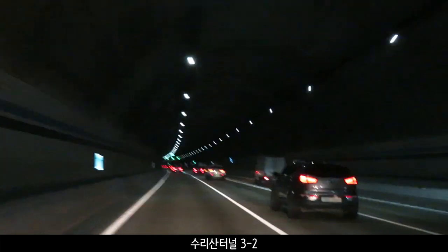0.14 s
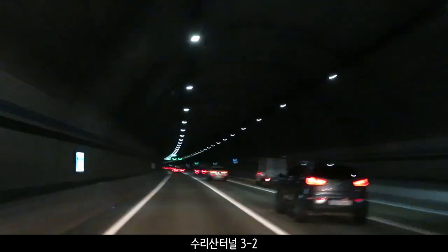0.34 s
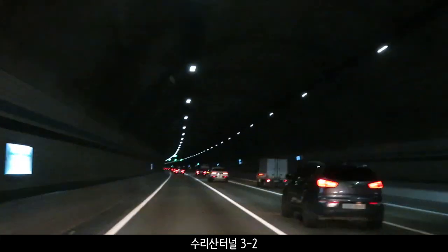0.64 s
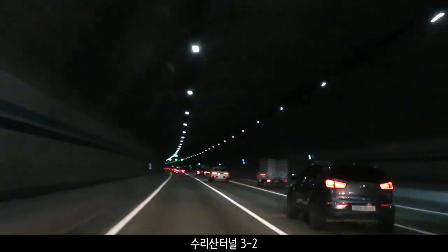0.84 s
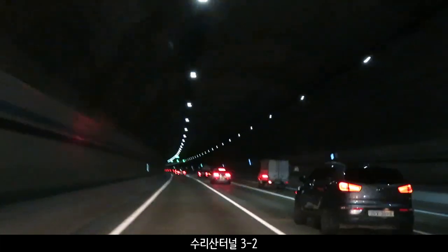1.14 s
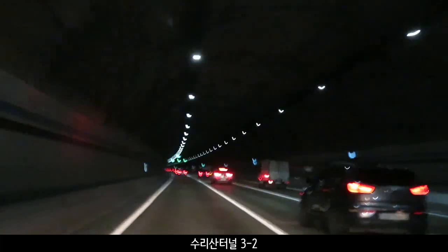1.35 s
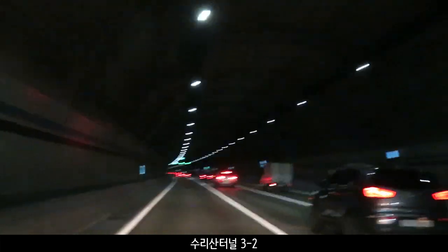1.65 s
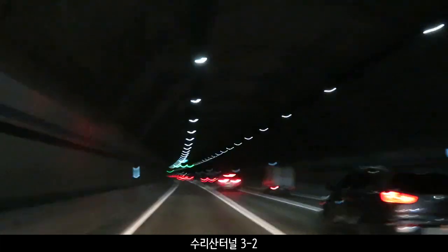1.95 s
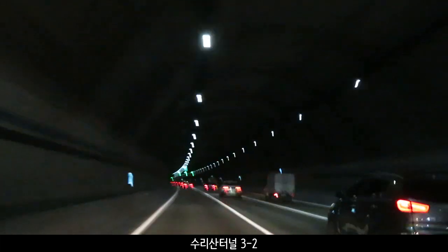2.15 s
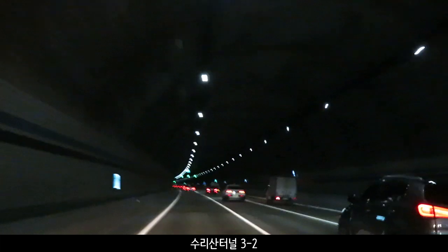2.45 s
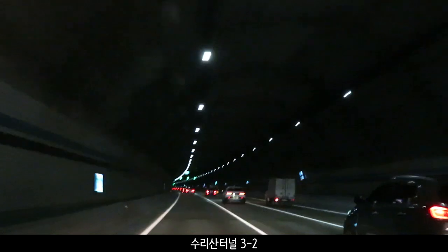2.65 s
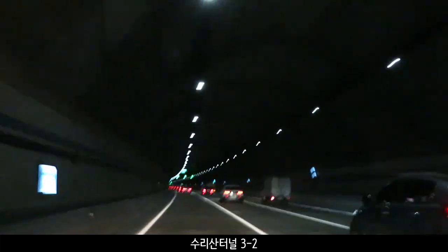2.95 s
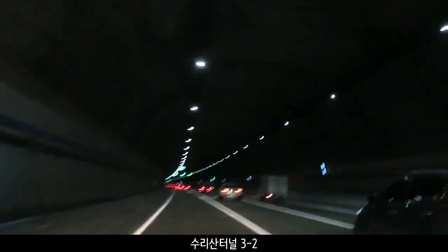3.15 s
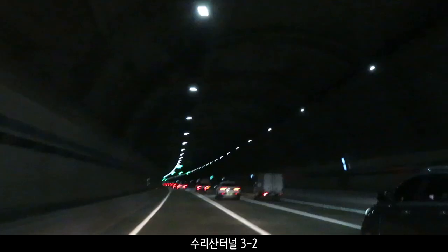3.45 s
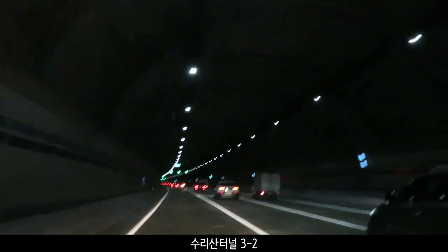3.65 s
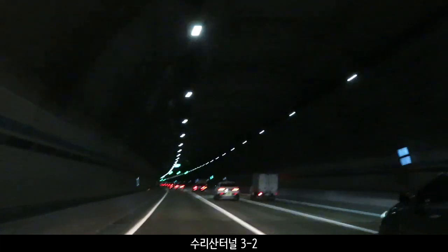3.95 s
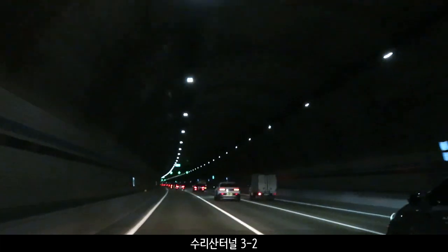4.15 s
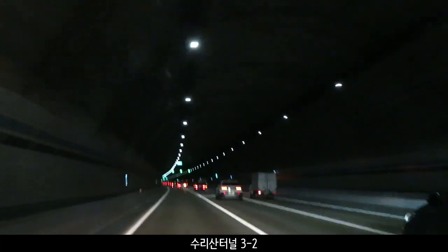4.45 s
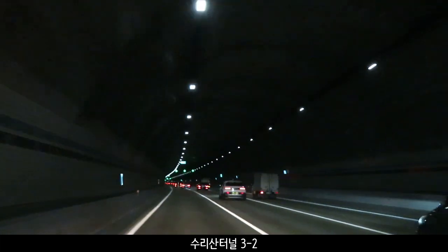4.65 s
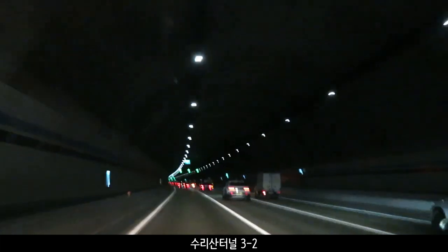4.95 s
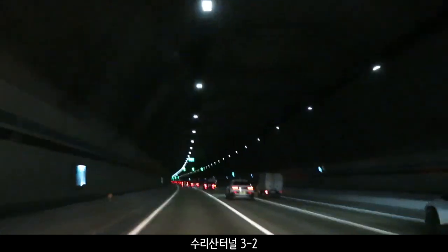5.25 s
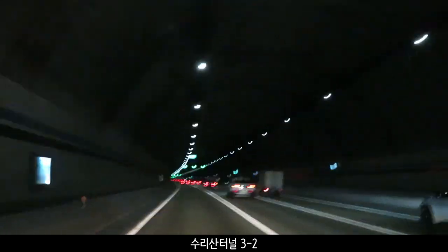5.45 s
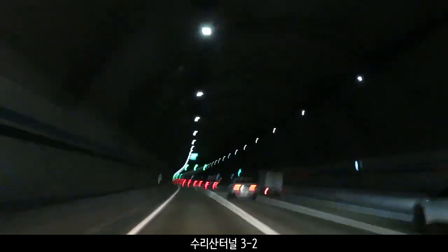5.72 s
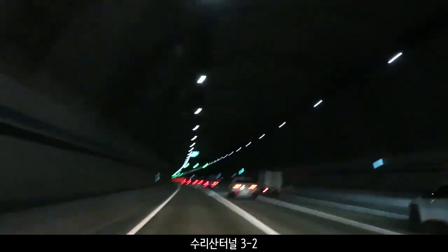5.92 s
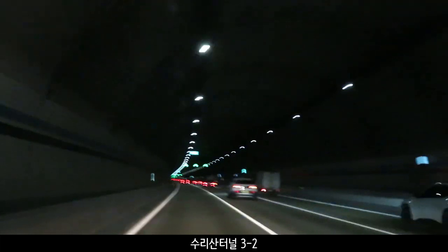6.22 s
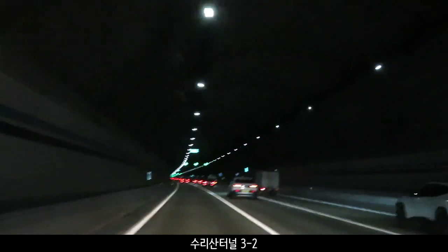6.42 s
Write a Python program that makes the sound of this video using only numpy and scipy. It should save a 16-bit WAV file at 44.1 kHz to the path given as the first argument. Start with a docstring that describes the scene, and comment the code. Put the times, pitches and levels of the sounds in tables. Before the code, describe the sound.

Heard from the dashboard of a car cruising through a tunnel: a deep, uneven cabin rumble, dull tyre roar, faint hiss and low engine hum. Faint knocks pass early on. About two thirds through, the wheels hit a road joint with a heavy, boomy double thump; the rumble dips briefly in level, then recovers and continues.

```python
"""A low cabin boom and tyre roar inside a car in a highway tunnel, then a double thump over a road joint.
Boom and drone are noise shaped by cabin resonances; roar and hiss are noise following the road surface.
The joint rings decaying body modes; an engine hum, grit, short dull knocks and trim ticks lie beneath.
The recorder's gain control ducks at the thump and recovers slowly."""
import sys
import numpy as np
from scipy import signal
from scipy.fft import rfft, irfft
from scipy.io import wavfile
from scipy.ndimage import uniform_filter1d, minimum_filter1d

SR = 44100
rng = np.random.default_rng(int(sys.argv[2]) if len(sys.argv) > 2 else 0)


def store_pcm(level_fs):
    """Save levels as 16-bit WAV."""
    pcm = np.round(np.clip(level_fs, -1, 1) * 32767).astype(np.int16)
    wavfile.write(sys.argv[1], SR, np.atleast_2d(pcm).T)


N = 290178
TIME = np.arange(N) / SR  # seconds
BINS = np.fft.rfftfreq(N, 1 / SR)  # Hz

# Spectrum of the body shake. Each row: frequency in Hz, relative density in dB.
SHAKE_SPECTRUM = [(8, -31), (18, 9), (26, 1), (52, 0.5), (75, -29.5)]
# Spectrum of the cabin air boom. Each row: frequency in Hz, relative density in dB.
BOOM_SPECTRUM = [(45, -20), (62, -3.5), (88, 1.5), (112, 2), (135, -14.5), (200, -35.5)]
# Spectrum of the road drone. Each row: frequency in Hz, relative density in dB.
DRONE_SPECTRUM = [(70, -28.5), (110, -20.5), (135, -4.5), (180, -3), (250, -5.5), (320, -9.5), (400, -21),
                  (900, -71.5)]
# Resonances of suspension, cabin air and tyre cavities, then peaks and dips of the glass.
# Each row: frequency in Hz, width in Hz, lift in dB.
CABIN_RESONANCES = [(45.6, 14, 12.5), (70.5, 19, 4.5), (109.5, 18, -0.5), (142, 45, 3), (185.8, 15, 4),
                    (210.7, 6.6, 5.5), (243, 45, 2.5), (532, 23, 1.5), (886, 40, 0.5), (1065, 60, -1),
                    (1220, 110, 0.5), (1330, 55, -0.5), (1440, 70, 1), (2350, 110, -1.9), (2550, 73, 2)]
# Coarseness of the road surface. Each row: time in seconds, level in dB.
SURFACE_LEVEL = [(0.03, 2.5), (0.19, 2.5), (0.26, 1.5), (0.35, 1), (0.53, -0.9), (0.6, -2.5), (.82, -1),
                 (1.0, 1), (1.14, 1.3), (1.21, -0.7), (1.68, -0.1), (1.94, 0.4), (1.99, -3), (2.11, -2.5),
                 (2.2, -1.5), (2.45, 1), (2.57, -1.7), (2.82, 1.4), (3.0, -1.6), (3.24, -1.6), (3.55, 1.5),
                 (3.72, 2.5), (3.9, 2.5), (4.0, 0.5), (4.22, 3), (4.54, 3.5), (4.6, 0.1), (4.76, 1.5),
                 (4.85, 1.5), (5.2, 1.5), (5.45, 0.5), (5.9, 0), (5.98, -0.9), (6.27, 2), (6.33, -1.5),
                 (6.47, -3), (6.55, -1.3)]
# Level of the cabin boom. Each row: time in seconds, level in dB.
BOOM_LEVEL = [(0.5, -17.5), (1.8, -24.5), (2.22, -21), (2.85, -19), (4.4, -20.5), (5.1, -18), (6.2, -17.5)]
# Road bumps: long waves shake the body, short ones drone.
# Each row: centre in seconds, shake lift in dB, drone lift in dB.
BUMPS = [(.13, 5, 1.5), (.41, 0.5, 2), (.57, 6.5, 2.5), (.8, 6, 1), (1.04, 4, -1), (1.19, 8, 0.5),
         (1.5, 4.5, 3), (1.73, 1, 0.5), (1.95, 4.5, 3), (2.42, 4, -1), (2.68, 2.5, 0), (2.85, 7, -0.5),
         (3.14, -0.5, -1), (3.72, 0, 1), (3.9, 5.5, -2), (4.64, -5, 1.5), (5.5, 4, 3.5), (6.05, 1.5, -1),
         (6.28, 4.5, 0)]
BUMP_S = 0.067  # half-length of a swell, to 1/e of its lift in dB
# Brief low hums of cabin and engine, each swelling and fading.
# Each row: start in seconds, length in seconds, frequency in Hz, peak level in dB.
BRIEF_HUMS = [(0.285, 0.44, 105.3, -14), (0.698, 0.74, 72, -19.5), (1.115, 0.25, 153, -19.5),
              (1.417, 0.61, 71.8, -18), (1.853, 0.26, 152, -22.5), (2.281, 0.24, 192.8, -20.5),
              (2.64, 0.75, 70.34, -15.5), (3.542, 0.23, 243, -20.5), (3.66, 0.16, 155, -15.5),
              (3.715, 0.23, 211.3, -23.5), (3.794, 0.18, 72.6, -12.5), (3.8, 0.65, 103.8, -21.5),
              (4.404, 0.25, 240, -30), (5.973, 0.14, 166.3, -14.5), (6.017, 0.4, 212.2, -25)]
# A small seam, then the joint: front wheels hit, drop and bottom the suspension; rear wheels
# follow and rebound. Each row: start in seconds, thud in dB, contact in Hz, slap in dB.
BLOWS = [(4.326, -14, 260, -16), (4.635, -11, 450, -7), (4.644, -8.5, 453, -16), (4.657, -10, 200, -16.5),
         (4.681, 4, 190, -27), (4.791, -4, 117, -11.5), (4.853, 4, 80.6, -34)]
# Ringing modes of the body. Each row: frequency in Hz, relative level in dB, 60 dB decay in seconds.
BODY_MODES = [(43, -6.5, 0.35), (67.4, -32.5, 0.045), (77.7, 1.5, 0.23), (109, -5.5, 0.54), (151, 0, 0.14),
              (195.5, -8.5, 0.64), (225.4, -7, 0.23)]
# Spectrum of tread slapping an edge. Each row: frequency in Hz, relative density in dB.
SLAP_SPECTRUM = [(100, -13), (300, 8.5), (480, 10), (720, 4), (1100, -13.5), (3000, -44), (9000, -58.5)]
# The rear suspension meets its stop. Each row: centre in seconds, peak level in dB, pulse rate in Hz.
SHOVES = [(4.812, 8.5, 44)]
# Spectrum of the tyre roar. Each row: frequency in Hz, relative density in dB.
ROAR_SPECTRUM = [(150, -22.5), (330, 0.5), (440, 4), (600, -2.5), (880, -4.5), (1060, -10), (1500, -13),
                 (3000, -35), (8000, -94.5)]
# Tyre hiss through the glass, lower and top part. Each row: frequency in Hz, relative density in dB.
HISS_SPECTRUM = [(500, -13), (1050, 0.5), (1500, 0), (2100, -3), (3000, -8), (4000, -15), (5600, -24.5)]
HISS_TOP = [(8000, -33.5), (11000, -40), (14500, -52)]
# Hiss of opposite sign in the two ears, lower and top part, on the scale of the hiss.
# Each row: frequency in Hz, relative density in dB.
DIFFUSE_SPECTRUM = [(40, -42), (250, -2.5), (400, -7.5), (800, -8.5), (2000, -16), (3700, -21), (5800, -30),
                    (8000, -33.5)]
DIFFUSE_TOP = [(10500, -39), (13500, -43)]
FIRING_HZ = 76.9  # mean engine firing rate at cruising speed
# Level of the engine hum. Each row: time in seconds, level in dB.
HUM_LEVEL = [(.4, -3.5), (1.1, -1), (2.0, 0.5), (2.22, -3), (2.8, -1), (4.4, -1), (5.0, 0), (6.4, -3.5)]
# Spectrum of the grit and of the dull knocks. Each row: frequency in Hz, relative density in dB.
GRIT_SPECTRUM = [(200, -10.5), (420, -0.5), (850, 4), (1100, -12), (1600, -12), (2600, -28), (5000, -47)]
# Short dull knocks. Each row: start in seconds, level in dB.
KNOCKS = [(.162, -28), (.942, -33), (1.326, -20), (1.515, -26)]
# Ticks of interior trim. Each row: start in seconds, level in dB.
TICKS = [(.162, -53), (1.438, -54), (3.522, -58), (4.45, -60), (4.659, -48.5), (4.671, -52)]
# Spectrum of a trim tick. Each row: frequency in Hz, relative density in dB.
TRIM_SPECTRUM = [(1000, -35), (4200, 8), (6800, -3), (9000, -10), (12000, -15), (15000, -35)]
CEILING_DB = -1.4  # peak level above which the gain control acts
EDGE_HZ = 14400  # upper band limit


def rolling(shake_db=-19.5, boom_db=-1.0, drone_db=-23, drone_follow=0.8):
    """Road texture drives the cabin in three registers, bumps vary two of them; brief hums are added."""
    surface, = level(SURFACE_LEVEL)
    boom_level, = level(BOOM_LEVEL)
    shake = amp(shake_db)
    boom = amp(boom_db) * boom_level
    drone = amp(drone_db) * surface ** drone_follow
    for s, shake_lift_db, drone_lift_db in BUMPS:
        swell = np.exp(-((TIME - s) / BUMP_S) ** 2)
        shake = shake * amp(shake_lift_db * swell)
        drone = drone * amp(drone_lift_db * swell)
    out, resonances = np.zeros(N), cabin()
    for gain, spectrum in ((shake, SHAKE_SPECTRUM), (boom, BOOM_SPECTRUM), (drone, DRONE_SPECTRUM)):
        out += gain * steady(noise(shape(spectrum) * resonances), size=4500)
    for s, length_s, hz, db in BRIEF_HUMS:
        arch = np.sin(np.pi * np.clip((TIME - s) / length_s, 0, 1))
        out += amp(db) * arch * np.sin(2 * np.pi * hz * TIME)
    return out


def joint(slap_t60_s=0.037, slap_rise_s=0.0019, rise_cycles=0.31):
    """Blows ring the body, softer contacts slower and lower; tread slaps and the stop shoves the air."""
    out = np.zeros(N)
    for s, thud_db, contact_hz, slap_db in BLOWS:
        for hz, db, t60_s in BODY_MODES:
            reach = amp(thud_db + db) / (1 + (hz / contact_hz) ** 2)
            envelope = burst(s, rise_cycles / contact_hz, t60_s)
            out += reach * envelope * np.sin(2 * np.pi * hz * (TIME - s))
        out += amp(slap_db) * burst(s, slap_rise_s, slap_t60_s) * unit(noise(shape(SLAP_SPECTRUM)))
    for s, db, hz in SHOVES:
        u = (np.pi * hz * (TIME - s)) ** 2
        out += amp(db) * (1 - 2 * u) * np.exp(-u)  # one push between two shallower dips
    return out


def tyres(roar_db=-30, surge_db=0.4, surge_hz=9,
          hiss_db=-42, hiss_follow=0.85, flutter_db=0.82, flutter_hz=18):
    """Roar and hiss follow the surface and come through the glass; roar surges, hiss flutters."""
    surface, = level(SURFACE_LEVEL)
    direct = noise(shape(HISS_SPECTRUM + HISS_TOP) * cabin())
    diffuse = noise(shape(DIFFUSE_SPECTRUM + DIFFUSE_TOP))
    ears = np.array([direct + diffuse, direct - diffuse]) / np.std(direct)
    roar_noise = steady(noise(shape(ROAR_SPECTRUM) * cabin()), size=5000)
    roar = amp(roar_db + surge_db * wander(surge_hz)) * surface * roar_noise
    hiss = amp(hiss_db + flutter_db * wander(flutter_hz)) * surface ** hiss_follow * ears
    return roar + hiss


def engine(firing_db=-27.5, double_db=-28.5, waver_ratio=0.02275, waver_hz=4, swell_db=2, swell_hz=3):
    """The firing rate and its double hum, wavering a little in pitch and level."""
    rate_hz = FIRING_HZ * (1 + waver_ratio * wander(waver_hz))
    phase = 2 * np.pi * np.cumsum(rate_hz) / SR
    hum = level(HUM_LEVEL)[0] * amp(swell_db * wander(swell_hz))
    tones = amp(firing_db) * np.sin(phase) + amp(double_db) * np.sin(2 * phase)
    return np.sqrt(2) * hum * tones


def grit(grit_db=-35.5, strikes_per_s=300, spread_db=3, spread_cap=2):
    """Coarse stones in the asphalt strike the tread at random and knock through the cabin."""
    surface, = level(SURFACE_LEVEL)
    strikes = rng.random(N) < strikes_per_s / SR
    signs = rng.choice([-1, 1], N)
    sizes = amp(spread_db * np.minimum(rng.exponential(1, N), spread_cap))
    stones = irfft(rfft(strikes * signs * sizes) * shape(GRIT_SPECTRUM) * cabin(), N)
    return amp(grit_db) * surface * unit(stones)


def knocks(rise_s=0.00039, t60_s=0.048):
    """Short dull knocks: decaying bursts of low-mid noise."""
    envelope = sum(amp(db) * burst(s, rise_s, t60_s) for s, db in KNOCKS)
    return envelope * unit(noise(shape(GRIT_SPECTRUM)))


def trim(rise_s=0.00042, t60_s=0.072):
    """Plastic trim ticks as the car is jolted: bright noise bursts, independent in each ear."""
    envelope = sum(amp(db) * burst(s, rise_s, t60_s) for s, db in TICKS)
    return envelope * np.array([unit(noise(shape(TRIM_SPECTRUM))) for ear in range(2)])


def cabin():
    """Gain per bin of the cabin's resonances, their lifts summed in dB."""
    return amp(sum(db / (1 + (2 * (BINS - hz) / width_hz) ** 2) for hz, width_hz, db in CABIN_RESONANCES))


def amp(db):
    """Decibels to gain."""
    return 10 ** (np.asarray(db) / 20)


def level(rows):
    """Gain curves over time from rows of seconds and dB, one curve a dB column."""
    s, *columns = np.transpose(rows)
    return [amp(np.interp(TIME, s, db)) for db in columns]


def shape(points):
    """Gain per bin of a spectrum drawn on a log-frequency axis, silent from its last point up."""
    hz, db = np.transpose(points)
    return amp(np.interp(np.log(BINS + 1), np.log(hz), db)) * (BINS < hz[-1])


def noise(gain):
    """Random noise with the given gain per bin."""
    return irfft(rfft(rng.standard_normal(N)) * gain, N)


def unit(x):
    """Scales to rms 1."""
    return x / np.sqrt(np.mean(x ** 2) + 1e-20)


def steady(x, size):
    """Holds the running rms near 1, so that the road sets the swells; size in samples."""
    power = uniform_filter1d(uniform_filter1d(x ** 2, size), size)
    return x / np.sqrt(power + 1e-20)


def wander(hz):
    """Slow random drift of rms 1, mostly below the given rate."""
    return unit(noise(1 / (1 + (BINS / hz) ** 4)))


def burst(s, rise_s, t60_s):
    """Envelope that starts at s, rises and dies away by 60 dB per t60_s."""
    age = np.maximum(TIME - s, 0)
    return (1 - np.exp(-age / rise_s)) * np.exp(-np.log(1000) * age / t60_s)


def scene():
    """Everything heard at the dashboard."""
    return rolling() + tyres() + grit() + knocks() + engine() + joint() + trim()


def record(dry, recover_db_per_s=11, hold_samples=6001, attack_samples=400):
    """Gain control falls just ahead of each peak, holds and recovers slowly; then the band limit."""
    over_db = np.maximum(20 * np.log10(abs(dry).max(0) + 1e-9) - CEILING_DB, 0)
    # the window reaches slightly ahead and mostly back
    held_db = -minimum_filter1d(-over_db, hold_samples, origin=(hold_samples - attack_samples) // 2)
    fall_db = TIME * recover_db_per_s
    recovering_db = np.maximum.accumulate(held_db + fall_db) - fall_db
    duck_db = uniform_filter1d(recovering_db, attack_samples)
    lowpass = signal.firwin(511, EDGE_HZ, window=("kaiser", 9), fs=SR)
    soft_ends = np.clip(np.minimum(TIME, TIME[::-1]) / 0.002, 0, 1)  # 2 ms fades
    return signal.oaconvolve(dry * amp(-duck_db) * soft_ends, lowpass[None], "same")


dry = scene()
out = record(dry)
store_pcm(out)
```